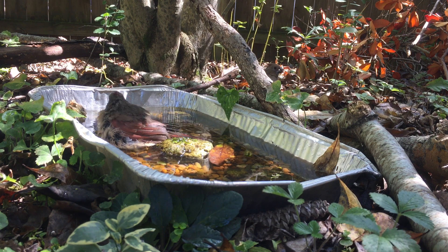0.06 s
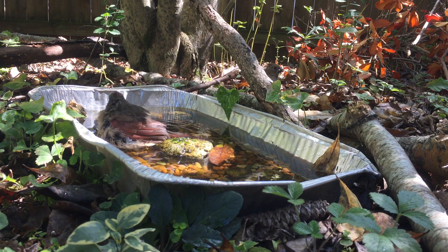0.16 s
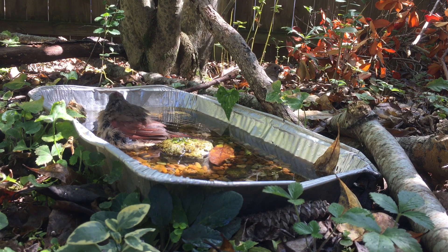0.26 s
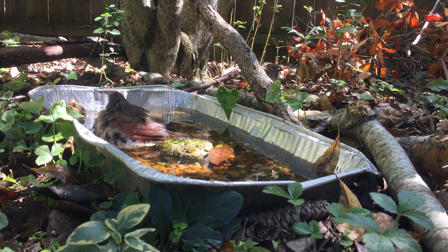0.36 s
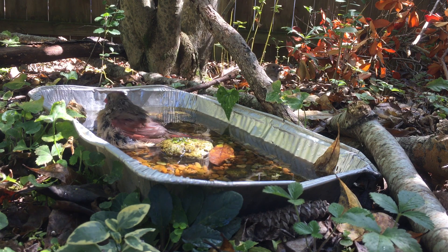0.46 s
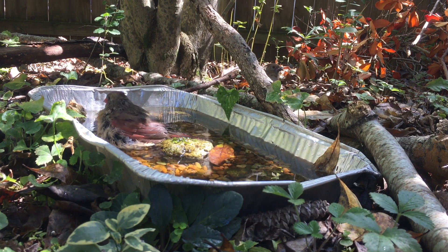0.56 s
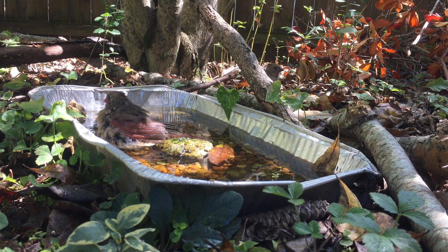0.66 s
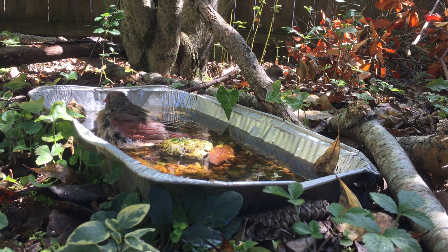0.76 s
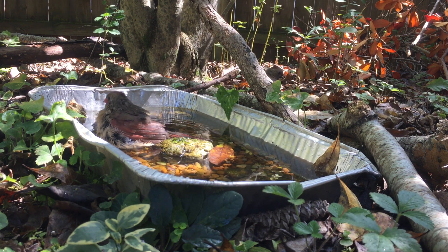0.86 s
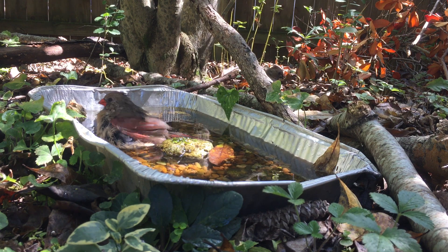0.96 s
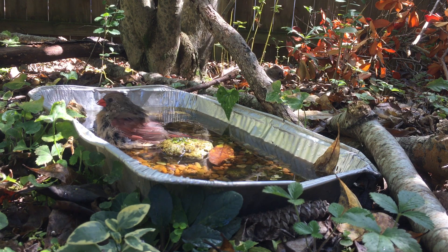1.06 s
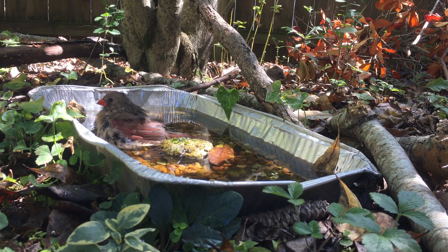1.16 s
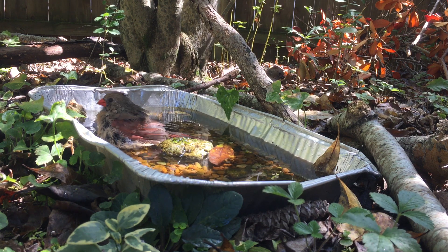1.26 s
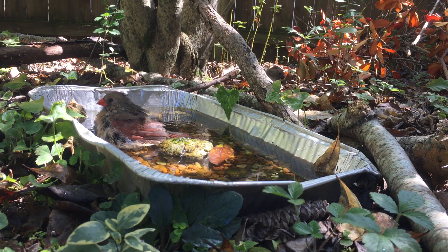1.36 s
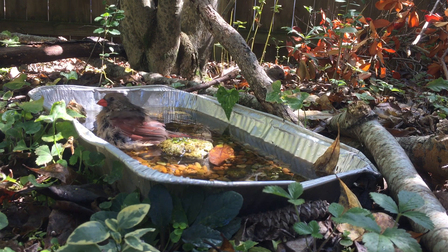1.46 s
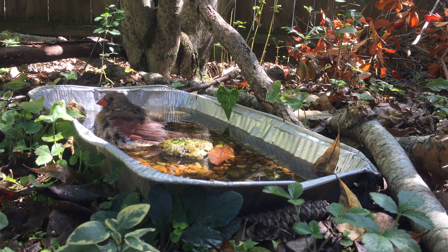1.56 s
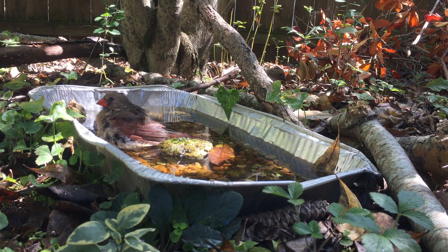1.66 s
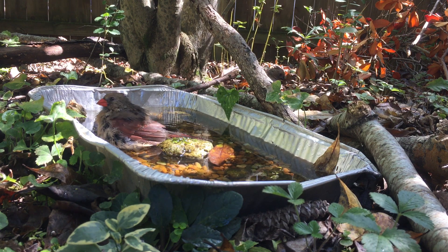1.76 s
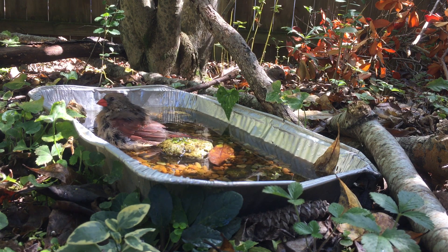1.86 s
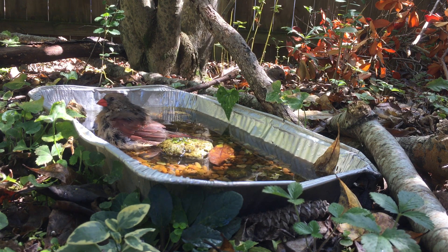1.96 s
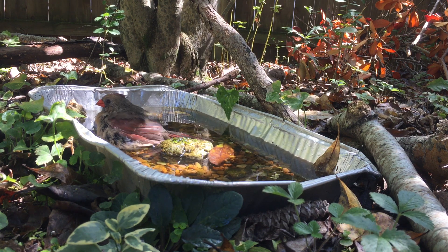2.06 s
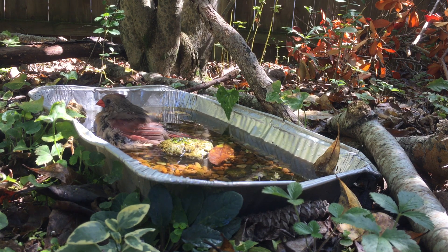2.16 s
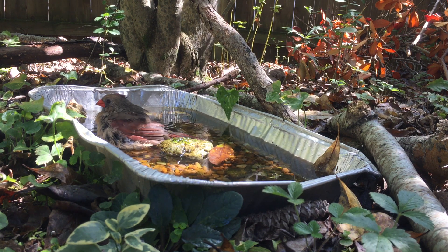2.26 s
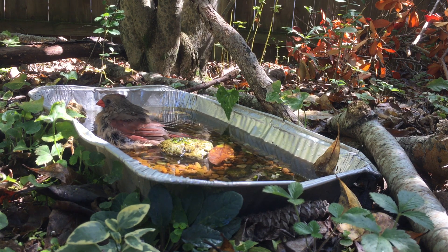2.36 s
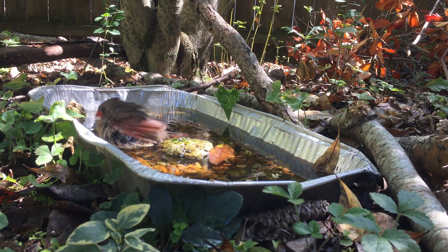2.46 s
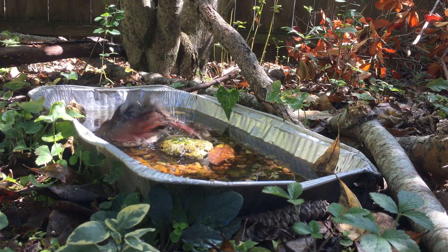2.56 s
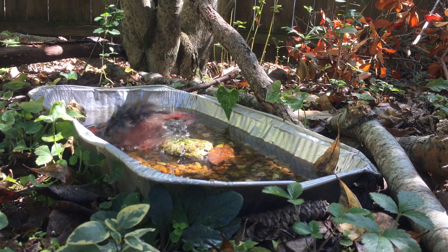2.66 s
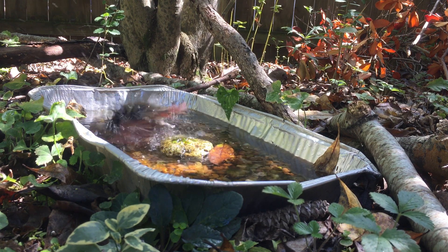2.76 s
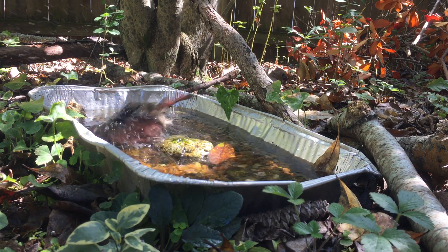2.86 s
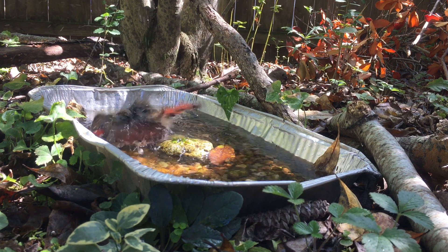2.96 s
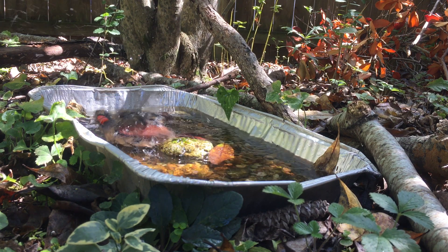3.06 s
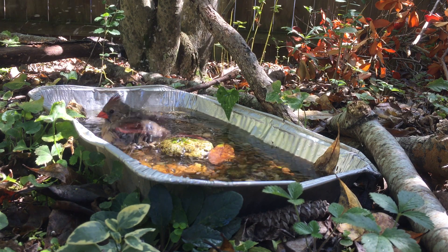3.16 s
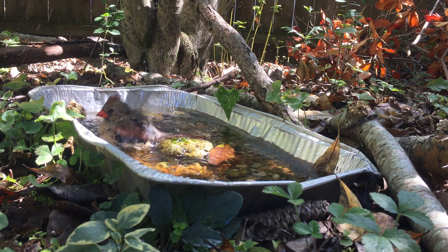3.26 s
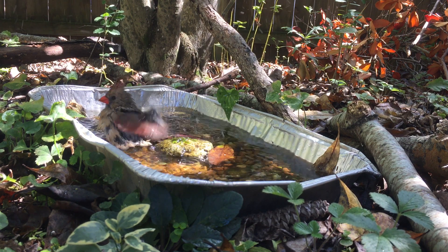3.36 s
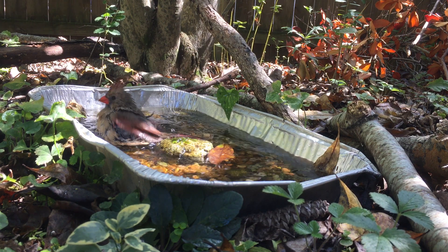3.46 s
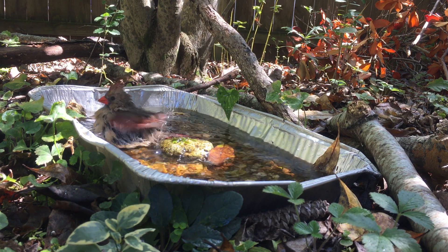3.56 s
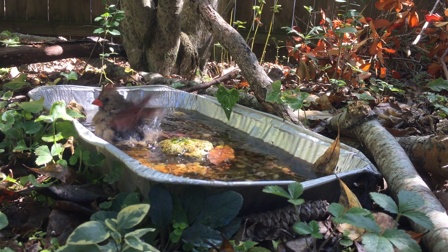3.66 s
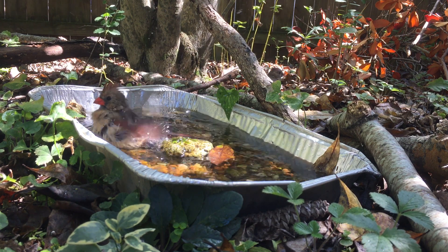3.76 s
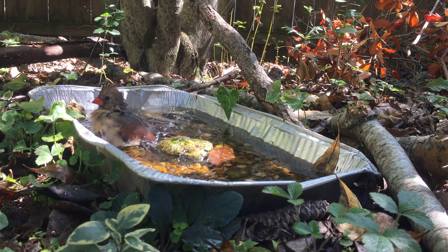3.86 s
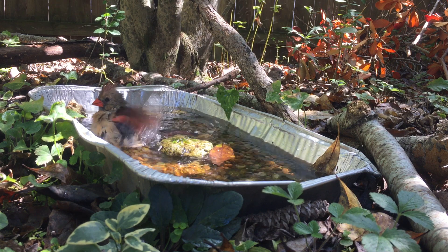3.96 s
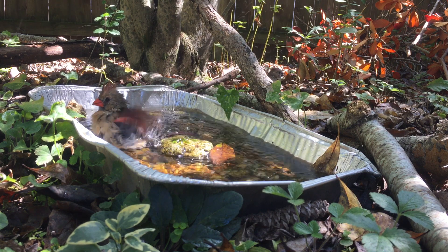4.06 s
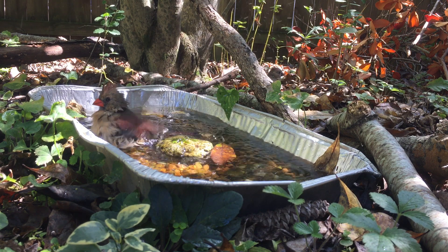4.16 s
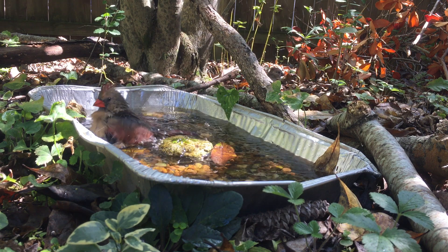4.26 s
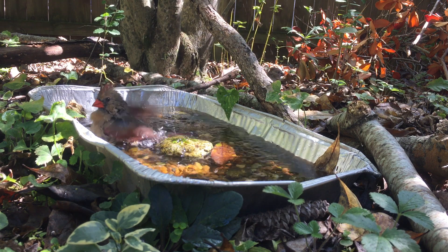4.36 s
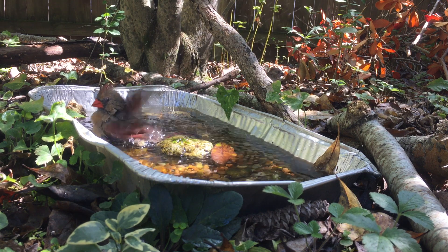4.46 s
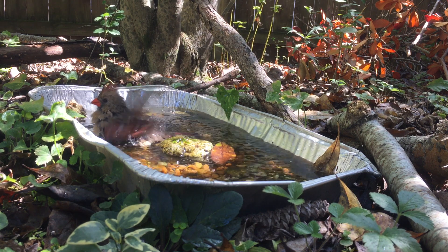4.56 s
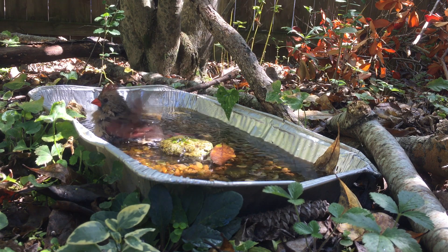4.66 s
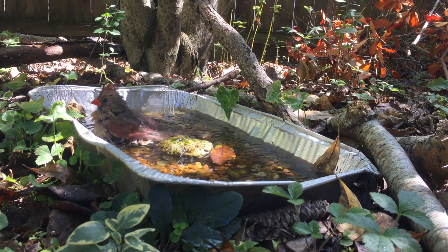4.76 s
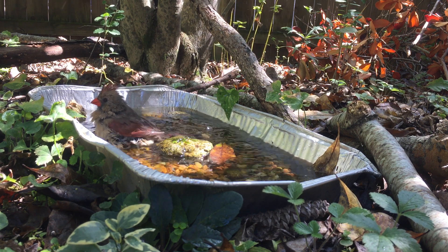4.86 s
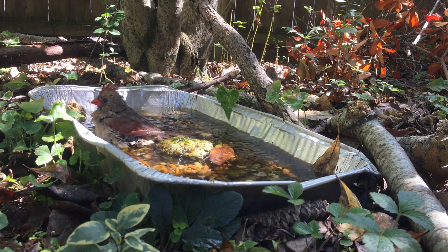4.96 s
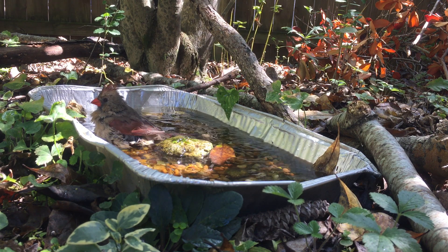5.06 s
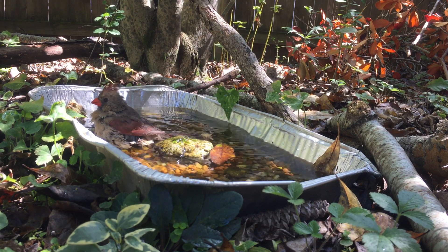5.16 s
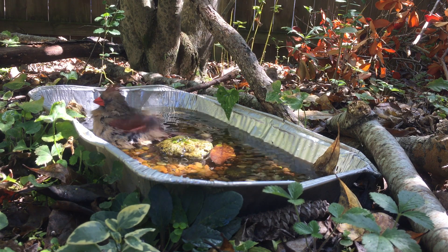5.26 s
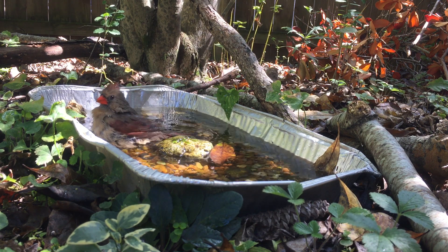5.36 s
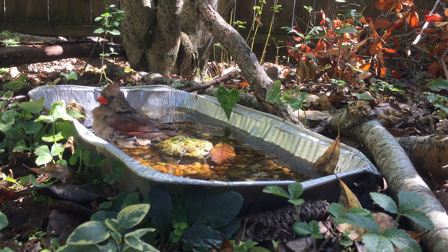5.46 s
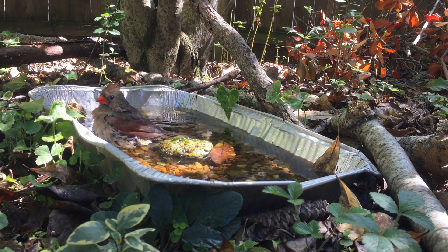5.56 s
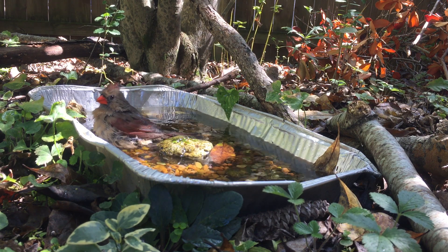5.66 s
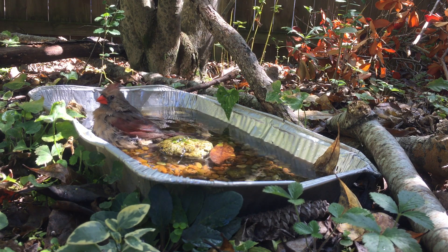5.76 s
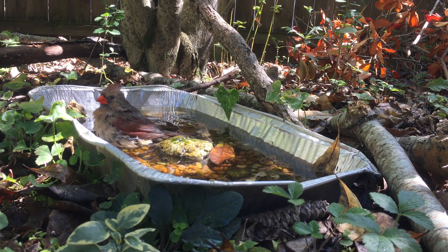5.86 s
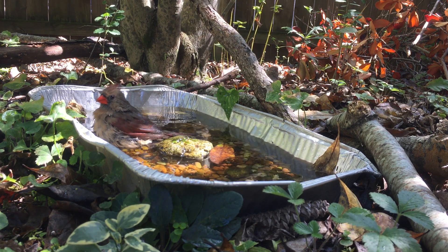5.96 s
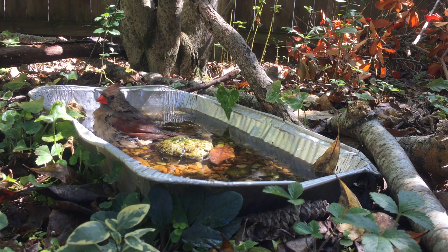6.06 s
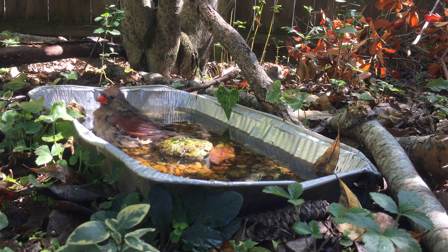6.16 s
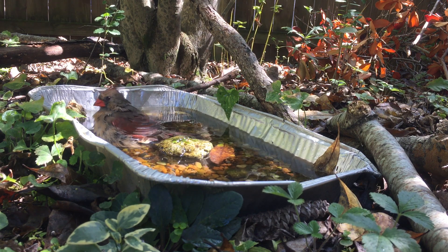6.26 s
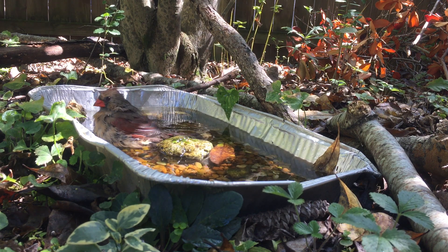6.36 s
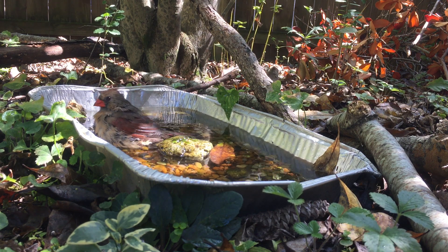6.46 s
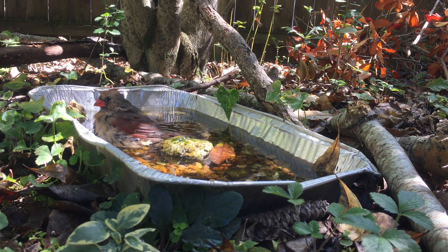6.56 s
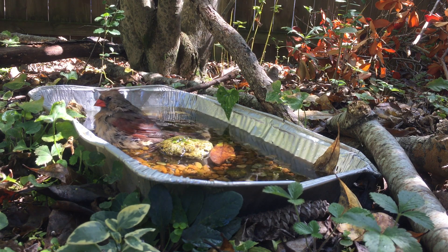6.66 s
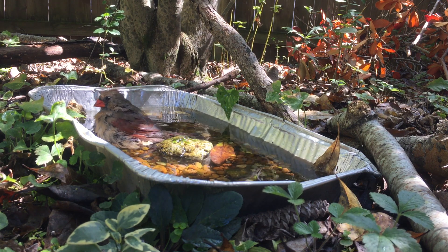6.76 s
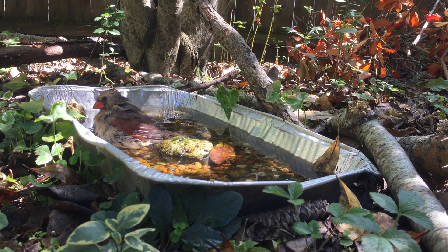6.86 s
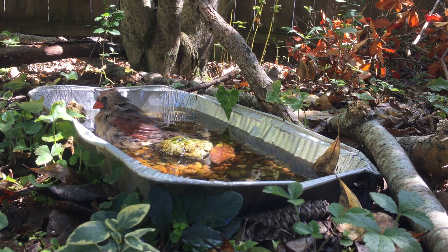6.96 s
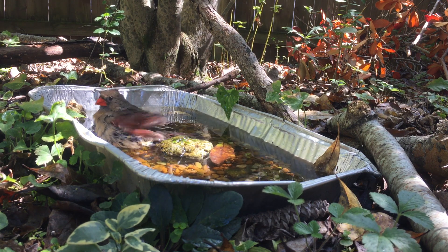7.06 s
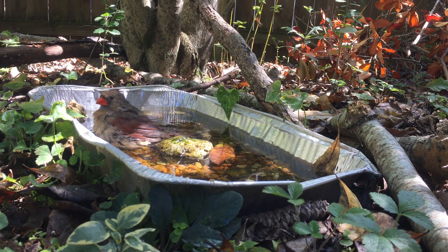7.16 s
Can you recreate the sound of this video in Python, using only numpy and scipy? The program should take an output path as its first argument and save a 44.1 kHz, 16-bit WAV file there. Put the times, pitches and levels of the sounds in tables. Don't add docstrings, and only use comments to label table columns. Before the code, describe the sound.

A songbird bathes in a shallow foil tray, two bursts of rapid wing-slapping splashes over a low throbbing distant hum, with two sharp chips.

```python
import sys
import numpy as np
from scipy import signal
from scipy.fft import rfft, irfft
from scipy.io import wavfile
from scipy.ndimage import uniform_filter1d

SR = 44100
rng = np.random.default_rng(int(sys.argv[2]) if len(sys.argv) > 2 else 0)


def wav_record(signal):
    frames = np.transpose(np.atleast_2d(signal))
    bounded = np.clip(frames, -1, 1)
    quanta = np.round(bounded * 32767).astype(np.int16)
    wavfile.write(sys.argv[1], SR, quanta)


def volts(x):
    e = np.asarray(x, float) / 20
    return 10 ** e


N = 318402
TIME = np.arange(N) / SR
WET_START_S, WET_END_S = 2.62, 5.02


def curve(table):
    s, *columns = np.transpose(table)
    return [np.interp(TIME, s, column) for column in columns]


def colour(x, table):
    hz, db = np.transpose(table)
    f = np.arange(N // 2 + 1) * SR / N + 1
    gain_db = np.interp(np.log(f), np.log(hz), db, left=-99, right=-99)
    y = irfft(rfft(x) * volts(gain_db), N)
    return y / y.std()


def sieve(x, order, hz, kind):
    return signal.sosfilt(signal.butter(order, hz, kind, fs=SR, output="sos"), x)


def soften(x, order, hz):
    return signal.sosfiltfilt(signal.butter(order, hz, fs=SR, output="sos"), x)


def band(x, lo_hz, hi_hz, order=2):
    y = sieve(x, order, [lo_hz, hi_hz], "bandpass")
    return y / y.std()


def noise():
    return rng.standard_normal(N)


def walk(rate):
    k = int(SR / rate)
    held = np.repeat(rng.standard_normal(N // k + 1), k)
    return 1.72 * uniform_filter1d(uniform_filter1d(held, k), k)[:N]


def add(out, s, piece):
    i = int(s * SR)
    out[i:i + len(piece)] += piece


# (frequency [Hz], level [dB per Hz])
RUMBLE_COLOUR = [(15, -56), (25, -34), (54, -24), (84, -6.5), (117, -5.5), (156, -6), (210, -5), (361, -12),
                 (479, -15.5), (620, -24.5), (687, -29.5), (900, -64), (1170, -47), (1980, -120)]
# (frequency [Hz], level [dB per Hz])
HISS_COLOUR = [(410, -36), (700, -2.5), (910, -1.5), (1250, -1.5), (1360, -2.5), (2130, -5), (2730, -10),
               (4050, -8.5), (4800, -14.5), (6320, -13.5), (7590, -19), (8990, -18.5), (10500, -22.5),
               (15000, -22), (16000, -31)]
# (time [s], deep rumble level [dB], length [s])
LORRIES = [
    (.14, -38, 0.074),
    (.97, -45, 0.1),
    (2.796, -49, 0.12),
    (3.55, -47, 0.24),
    (4.1, -59, .15),
    (5.173, -43, 0.091),
    (5.955, -41, 0.15),
    (6.4, -60, 0.1),
    (6.842, -39, 0.66),
]
RUMBLE_DB, HISS_DB, DEEP_DB = -53, -70, -54
SWELL_START_DB, SWELL_END_DB, SWELL_FULL_S = -1.5, 1.3, 6.9


def town():
    swell_db = np.interp(TIME, [0, SWELL_FULL_S], [SWELL_START_DB, SWELL_END_DB])
    passing = volts(DEEP_DB)
    for s, db, length in LORRIES:
        passing = passing + volts(db) * np.exp(-((TIME - s) / length) ** 2)
    patches = np.zeros(N)
    for hz in 42 * 2 ** np.arange(0, 5, .5):
        patches += np.sqrt(hz) * volts(2.2 * walk(6)) * band(noise(), hz / 1.19, hz * 1.19)
    out = volts(RUMBLE_DB + swell_db) * colour(patches, RUMBLE_COLOUR)
    out += volts(-16.5) * passing * band(noise(), 53.6, 62.4)
    return out + volts(HISS_DB + 0.035 * walk(9.1)) * colour(noise(), HISS_COLOUR)


# (multiple of the turning rate, level under the fifth [dB])
ENGINE_ORDERS = [(2, -20), (3, -20), (4, -16), (6, -5), (8, -7), (9, -13), (10, -16), (11, -17), (12, -24),
                 (13, -17)]
# (time [s], fifth order level [dB])
ENGINE_LOAD = [(0, -66), (.3, -55), (.75, -54), (1.05, -51.5), (1.55, -54), (1.9, -54.5), (3.3, -50.5),
               (3.47, -68), (3.65, -52.5), (4.3, -48), (4.9, -53), (5.3, -49.5), (6.35, -53.5), (6.8, -49),
               (7.22, -48)]
# (time [s], level [dB])
BARK = [(0, -8), (1.25, -2.5), (2.05, 0), (2.3, 4.5), (3.0, 1), (3.7, 6), (4.1, -5), (4.5, 3.5),
        (7.22, 1.5)]
# (time [s], blade rate [Hz])
FAN_SPEED = [(0, 106.5), (.25, 106.65), (.6, 106.47), (.95, 105.88), (1.2, 106.1), (1.55, 105.78),
             (1.9, 106.58), (2.35, 107.42), (2.61, 106.93), (2.9, 106.06), (3.25, 106.57), (3.45, 107.35),
             (3.8, 106.94), (4.5, 106.61), (5.9, 106.89), (6.3, 106.42), (6.7, 105.46), (7.22, 106.72)]
# (time [s], level [dB])
FAN_HEARD = [(0, -61), (.25, -51), (.65, -50.5), (.87, -79), (1.15, -50), (1.47, -59.5), (1.85, -46),
             (2.4, -53.5), (2.62, -60), (3.15, -51.5), (3.4, -54.5), (3.85, -48), (4.45, -74), (5.4, -57),
             (5.75, -65), (6.3, -42), (6.65, -54), (7.22, -80)]
# (multiple, width [Hz], level [dB])
FAN_SMEAR = [(2, 15, -65), (3, 9.3, -70), (4, 6.3, -69.5), (5, 2.6, -88.5)]
# (frequency [Hz], level [dB])
STEADY_TONES = [(120, -64), (146, -66), (417.5, -78), (475, -72), (531, -79)]
ENGINE_HZ = 22.13


def hum():
    fan_hz, fan_db, engine_db, bark_db = (curve(table)[0] for table in (FAN_SPEED, FAN_HEARD, ENGINE_LOAD, BARK))
    turns = ENGINE_HZ * TIME
    out = volts(fan_db) * np.sin(2 * np.pi * np.cumsum(fan_hz) / SR)
    out += volts(engine_db) * np.sin(2 * np.pi * 5 * turns)
    for k, db in ENGINE_ORDERS:
        level_db = engine_db.mean() + db + (k > 7) * bark_db + 1.2 * walk(2.42)
        out += volts(level_db) * np.sin(2 * np.pi * k * (turns + 0.018 * walk(1.494)))
    for hz, db in STEADY_TONES:
        out += volts(db + 2.0 * walk(1.68)) * np.sin(2 * np.pi * (hz * TIME + rng.random()))
    out *= np.sqrt(2)
    for k, width, db in FAN_SMEAR:
        centre = k * fan_hz.mean()
        smear = band(noise(), centre - width / 2, centre + width / 2, order=1)
        out += volts(db + (k < 3) * bark_db + 1.2 * walk(2.993)) * smear
    return out


# (time [s], second level [dB], third level [dB])
OVERTONES = [(0.0, -77, -82), (0.2, -60.5, -68.5), (2.31, -62.5, -68), (2.37, -63, -55), (2.43, -55.5, -88),
             (2.61, -59.5, -63), (4.0, -54.5, -72.5), (4.12, -63, -50.5), (4.36, -55, -82),
             (4.44, -54, -63), (5.35, -64, -72), (5.47, -58, -54.5), (5.51, -51, -69), (5.97, -68, -56),
             (6.05, -53.5, -70), (7.02, -61, -62), (7.18, -51, -71), (7.22, -65, -43)]
# (time [s], level [dB], start [Hz], end [Hz], length [s])
FAR_CALLS = [
    (1.46, -83, 2830, 2880, .04),
    (1.54, -78, 2870, 2960, .07),
    (5.6, -80, 2950, 3050, .04),
]
# (time [s], level [dB], start [Hz], end [Hz], length [s])
SURGES = [
    (0.162, -57, 276, 277, 0.061),
    (.395, -62, 327, 334, 0.069),
    (.9, -54.5, 191.4, 199, .15),
    (1.2, -52.5, 208, 207, 0.095),
    (1.502, -61, 202, 210, 0.19),
    (4.799, -60, 366, 363, 0.066),
    (5.759, -62.5, 390, 396, 0.15),
    (6.676, -63.5, 534, 526, 0.086),
]
CRICKET_HZ, CRICKET_WIDTH_HZ, CRICKET_DB = 4080, 90, -102


def distance():
    turns = np.cumsum(curve(FAN_SPEED)[0]) / SR
    out = np.zeros(N)
    for k, db in zip((2, 3), curve(OVERTONES)):
        out += volts(db + 1.44 * walk(6.7)) * np.sin(2 * np.pi * (k * turns + 0.21 * walk(4)))
    for s, db, start_hz, end_hz, length in FAR_CALLS + SURGES:
        t = TIME - s
        swell = np.exp(-(2 * t / length) ** 2)
        glide = (start_hz + end_hz) * t + (end_hz - start_hz) / length * t ** 2
        out += np.sqrt(2) * volts(db) * swell * np.sin(np.pi * glide)
    cricket = band(noise(), CRICKET_HZ - CRICKET_WIDTH_HZ / 2, CRICKET_HZ + CRICKET_WIDTH_HZ / 2)
    return out + volts(CRICKET_DB + 4.8 * walk(15)) * cricket


# (delay [s], level [dB])
FENCES = [
    (.0155, -12),
    (.053, -13),
    (.0715, -6.5),
    (.098, -12),
]
GARDEN_T60_S, GARDEN_DB = .54, 4.5


def garden():
    t = np.arange(int(.7 * SR)) / SR
    direct = 1.3 * (t == 0)
    for s, db in FENCES:
        direct[int(s * SR)] = volts(db)
    direct = sieve(direct, 4, 6500, "lowpass")
    rattle = np.exp(-t / 0.0065) * rng.standard_normal(len(t))
    direct += 0.16 * sieve(rattle, 4, 10500, "highpass")
    twigs = np.exp(-t / .008) * (t > .006)
    trees = np.exp(-np.log(1000) * t / GARDEN_T60_S) * np.clip((t - .002) / .006, 0, 1)
    tail = volts(-46.0) * twigs / np.linalg.norm(twigs) + volts(GARDEN_DB) * trees / np.linalg.norm(trees)
    air = 1.8 * signal.lfilter(*signal.butter(2, 7500, "highpass", fs=SR), rng.standard_normal(len(t)))
    dull = soften(air, 8, 9800)
    air = dull + (air - dull) * np.exp(-t / .13)
    air += soften(air, 4, 6300) * (.8 * np.exp(-t / .45) - 1)
    return direct + tail * air


# (time [s], level [dB], start [Hz], end [Hz], glide [ms], length [ms])
CHIPS = [
    (3.574, -35.5, 5140, 8280, 11.7, 33.3),
    (5.536, -35.5, 5300, 8490, 11.8, 38.4),
]
# (frequency [Hz], level [dB])
BEAK = [(4000, 0), (9000, 3.5), (11500, 4.5), (12300, -10), (13000, -5), (13700, 5), (15200, 6),
        (15900, -25)]
OCTAVE_DB = -22


def chips():
    out = np.zeros(N)
    for s, db, start_hz, end_hz, glide_ms, ms in CHIPS:
        t = np.arange(int(ms * SR / 1000)) / SR
        hz = end_hz - (end_hz - start_hz) * np.exp(-t * 1000 / glide_ms)
        phase = 2 * np.pi * np.cumsum(hz) / SR
        attack = np.clip(t / 0.0025, 0, 1) ** 2.1
        swell = attack * (0.11 + 0.5 * np.exp(-t / 0.0041)) * np.clip((t[-1] - t) / 0.02, 0, 1)
        whistle = np.sin(phase) + volts(OCTAVE_DB) * np.sin(2 * phase)
        add(out, s, np.sqrt(2) * volts(db) * swell * whistle)
    heard = signal.fftconvolve(out, garden())[:N]
    return heard.std() * colour(heard, BEAK)


# (time [s], peak level [dB], frequency [Hz])
SPATTER = [(2.7516, -54, 4310), (2.7712, -57, 12580), (2.773, -56, 5170), (2.831, -47, 2240),
           (2.8677, -50, 11890), (2.8782, -55, 6370), (2.8824, -43, 2430), (2.9413, -55, 9130),
           (2.9954, -56, 8960), (2.996, -48, 6070), (3.0102, -57, 11200), (3.02, -53, 2570),
           (3.028, -59, 6200), (3.0425, -56, 13780), (3.056, -55, 6370), (3.0926, -51, 14810),
           (3.1049, -50, 3450), (3.1307, -49, 8790), (3.1394, -46, 3790), (3.1706, -52, 14300),
           (3.6727, -46.5, 6720), (3.8113, -56, 9650), (3.812, -49, 2930), (3.8581, -55, 13440),
           (3.8585, -56, 6200), (3.8592, -50, 2580), (3.9361, -58, 5860), (3.9361, -56, 9130),
           (3.9365, -55, 14640), (3.9365, -55, 11890), (3.9456, -55, 6370), (3.988, -52, 15160),
           (4.0323, -45, 14810), (4.0711, -47, 14300), (4.0713, -48, 3200), (4.0763, -49, 9130),
           (4.0769, -52, 14130), (4.083, -42, 6030), (4.0867, -59, 9130), (4.123, -49, 6430),
           (4.27, -56, 3790), (4.2765, -53, 11710), (4.4296, -55, 14990), (4.4659, -50, 3960),
           (4.4756, -49, 15160), (4.4767, -55, 9130), (4.4767, -57, 12060), (4.5217, -43, 12060),
           (4.5424, -54, 3960), (4.607, -47, 3790), (4.657, -40, 9300), (4.6886, -48, 11800),
           (4.707, -47, 4100), (4.707, -50, 6890), (4.734, -52, 9300), (4.7356, -52, 3960),
           (4.7372, -50, 12060), (4.7572, -48, 6340), (4.8054, -49, 3790), (4.8065, -57, 5860)]
TICK_MS, TICK_DB = 0.43, 0.5


def spatter():
    out, t = np.zeros(N), np.arange(-200, 300) / SR
    for (s, db, hz), turn in zip(SPATTER, rng.random(len(SPATTER))):
        ms = TICK_MS * (6000 / hz) ** 0.41
        shape = np.exp(-np.abs(t) * 1000 / np.where(t < 0, 0.56 * ms, 1.4 * ms))
        add(out, s + t[0], volts(db + TICK_DB) * 2.0 * shape * np.sin(2 * np.pi * (hz * t + turn)))
    return out


# (time [s], peak level [dB], frequency [Hz])
PLOPS = [(.535, -71, 720), (2.739, -43.5, 550), (2.739, -63, 1390), (2.876, -56, 1210), (3.027, -64, 1290),
         (3.09, -60, 1140), (3.145, -63, 1710), (3.18, -54, 700), (3.273, -64, 1080), (3.29, -62, 1120),
         (3.428, -65, 990), (3.477, -65, 1350), (3.557, -70, 1290), (3.762, -50, 610), (3.987, -53, 990),
         (4.077, -60, 1190), (4.274, -66, 1380), (4.326, -57, 680), (4.43, -47.5, 750), (4.513, -65, 1450),
         (4.566, -56, 1400), (4.657, -55, 1070), (4.657, -50, 1580), (4.757, -68, 1460), (4.807, -57, 780),
         (4.976, -68, 1240), (5.146, -63, 1030), (5.396, -54.5, 686)]
# (time [s], peak level [dB])
SNAPS = [(2.781, -42), (2.827, -24), (2.8762, -39), (3.1306, -28), (3.1705, -40), (3.8087, -42),
         (3.9011, -23), (3.9884, -38), (4.0333, -32), (4.4294, -41), (4.4757, -37), (4.5204, -33),
         (4.5674, -43), (4.6567, -33), (4.698, -41), (4.7068, -46), (4.7465, -43), (4.7655, -46),
         (4.8098, -38), (5.3945, -45), (3.0695, -45), (3.1052, -42), (3.504, -53), (3.716, -52),
         (3.756, -47), (3.8022, -46), (3.8525, -43), (4.1718, -40), (4.3722, -43), (4.8685, -52),
         (5.0652, -55), (5.399, -50), (2.736, -43), (4.0829, -33), (3.219, -46), (2.8872, -41)]
PLOP_MS = 1.7


def knocks():
    out, clicks, t = np.zeros(N), np.zeros(N), np.arange(-400, 600) / SR
    for (s, db, hz), turn in zip(PLOPS, rng.random(len(PLOPS))):
        shape = np.exp(-np.abs(t) * 1000 / np.where(t < 0, .5 * PLOP_MS, PLOP_MS))
        add(out, s + t[0], volts(db + 7) * shape * np.sin(2 * np.pi * (hz * t * (1 + 3.6 * t) + turn)))
    for s, db in SNAPS:
        clicks[int(s * SR)] = -volts(db)
    snaps = band(clicks, 3500, 16500)
    return out + snaps * np.abs(clicks).max() / np.abs(snaps).max()


def droplets(rate, scatter_db, smear_ms):
    size_db = scatter_db * np.minimum(rng.exponential(size=N), 3)
    ticks = (rng.random(N) < rate / SR) * volts(size_db)
    puffs = signal.lfilter([1], [1, -np.exp(-1000 / (smear_ms * SR))], ticks ** 2)
    return np.sqrt(puffs + 0.06 * puffs.mean()) * noise()


def puff(source, shape):
    piece = source * shape
    return piece * np.linalg.norm(shape) / np.linalg.norm(piece)


def fizz(rate, lo_hz, hi_hz, cycles, scatter_db):
    out, t = np.zeros(N), np.arange(500) / SR
    start, end = WET_START_S - .1, WET_END_S + .1
    for when, pitch, size in rng.random((int(rate * (end - start)), 3)):
        hz = lo_hz * (hi_hz / lo_hz) ** pitch
        ring = np.exp(-t * hz / cycles) * np.sin(2 * np.pi * hz * t * (1 + 0.016 * hz * t))
        add(out, start + when * (end - start), volts(-scatter_db * np.log(size + 0.022)) * ring)
    return out / out[int(start * SR):int(end * SR)].std()


# (time [s], blow level [dB], spray
# over blow [dB], bubble [Hz], spread [ms])
DIP = [(2.6827, -52, -7, 2900, 2.4), (2.7384, -38, -2, 2690, 3.1), (2.7884, -45.5, 3.5, 3900, 7),
       (2.827, -35.5, 4, 6450, 1.25), (2.876, -37, 1.5, 2010, 1.1), (2.8872, -54, -4, 2650, 3.1),
       (2.9298, -45.5, -3, 3150, 2.5), (2.981, -48, 7, 4430, 4.1), (3.04, -50, 4, 2640, 9.7),
       (3.091, -44, -4, 2840, 4.1), (3.1307, -46, 12.5, 6500, 1.2), (3.18, -54, -24, 2820, 4.1),
       (3.2717, -63, -12, 2082, 2.3), (3.3698, -59, -5.5, 2210, 12), (3.427, -60.5, -2, 2150, 6.6),
       (5.396, -55, -4, 2300, 3)]
# (time [s], blow level [dB], spray over blow [dB], bubble [Hz], spread [ms])
FLUTTER = [(3.763, -38, -2, 3550, 1.15), (3.8057, -38.5, -4, 3900, 0.64), (3.8534, -41.5, -4, 2500, 2),
           (3.9012, -34.5, 1.5, 4300, 2.3), (3.9438, -46, 2, 3660, 2.3), (3.988, -36.5, -0.5, 2300, 1.8),
           (4.0329, -31.5, 0.5, 4070, 1.6), (4.083, -32, -13, 3660, 1.3), (4.1232, -47.5, 3, 2760, 5.9),
           (4.1722, -35.5, -3.5, 2350, 2), (4.2243, -49, -2, 2580, 3.3), (4.2757, -52.5, 0, 2700, 4),
           (4.3275, -50.5, -6, 3300, 5.1), (4.373, -48.5, 0, 4010, 2), (4.4292, -41.5, -6, 2540, 1.9),
           (4.476, -34.5, -5, 2400, 2), (4.5205, -40.5, 4.5, 2533, 3.6), (4.5671, -36, -11, 3800, 1.1),
           (4.6107, -38.5, -4, 2710, 2), (4.6561, -35.5, -2, 4070, 1.5), (4.7063, -67, 19, 3950, 2.2),
           (4.7565, -41.5, -4.5, 2360, 3.4), (4.8093, -44, 4, 4000, 3.6), (4.8631, -50, -1, 3090, 2.4)]
# (time [s], blow level [dB],
# spray over blow [dB], bubble [Hz])
DROPS = [(2.6432, -56.5, -4, 3740), (2.658, -51.5, -30, 2680), (2.707, -52, 3, 5580),
         (2.8383, -45, 2, 6160), (2.9974, -45, 0, 5960), (3.0524, -47.5, -17, 2650),
         (3.0705, -55, 13, 4070), (3.1043, -54, -9, 3040), (3.145, -45, -3, 2750), (3.157, -44, -20, 3750),
         (3.171, -53.5, 12, 3640), (3.193, -55, -21, 2870), (3.2191, -49, -13, 2290),
         (3.251, -55.5, -2, 3750), (3.2841, -63, -15, 3814), (3.297, -64, -19, 2760),
         (3.3194, -61, -8, 2060), (3.4448, -54, 0, 2870), (3.504, -70, 17.5, 2820),
         (3.58, -57.5, -16, 3950), (3.589, -57.5, -7, 3970), (3.6534, -50, -3, 2980),
         (3.676, -62, -22, 2460), (3.7019, -58, -5, 3400), (3.716, -55.5, 9, 3840), (3.727, -58, -9, 3280),
         (0.5227, -64, -5, 4030), (5.258, -66, 4, 5600), (2.1598, -57, -5, 3400), (0.535, -65, -25, 710)]
# (time [s], blow level [dB], spray over blow [dB], bubble [Hz])
SHAKEN = [(3.75, -56, -2, 8500), (3.755, -49, -7, 3530), (3.774, -47, -14, 7040), (3.794, -66, 1, 13000),
          (3.9278, -52, -16, 4050), (3.9515, -58, 11, 6800), (3.978, -45, 1, 2780), (4.0934, -58, 18, 6000),
          (4.1616, -49, -3, 4030), (4.2924, -59, -23, 2710), (4.3474, -71, -13, 4220),
          (4.3818, -52, 2, 3200), (4.4656, -55, -9, 4180), (4.5422, -63, 5, 4170), (4.5596, -58, 17, 3830),
          (4.7465, -75, 12, 2430), (4.6983, -70, 20, 7020), (4.7356, -68, 4, 4030), (4.7655, -74, 16, 3940),
          (4.969, -59, -1, 4080), (5.066, -76, 21, 2205), (5.14, -64, -14, 3370),
          (5.1464, -55.5, -6.5, 2260), (5.1643, -57.5, -5, 2000), (5.246, -63, 7, 1840),
          (5.294, -63, -7, 4200), (5.508, -66, 4, 4500), (5.61, -68, -14, 2960), (5.012, -65, 0, 4300)]
# (time [s], thud level on the tray [dB])
DIP_DEPTH = [(2.68, -57.5), (2.737, -48.5), (2.83, -56), (2.9, -50), (3.0, -64.5), (3.09, -49.5),
             (3.13, -72), (3.18, -53), (3.43, -67.5)]
# (time [s], thud level on the tray [dB])
FLUTTER_DEPTH = [(3.76, -50), (3.98, -48), (4.08, -52), (4.38, -55.5), (4.43, -47), (4.48, -48),
                 (4.66, -45.5), (4.83, -56.5), (5.39, -54)]
DROP_MS, DROP_THUD_DB = 3.6, -22


def blows():
    s, db, over_db, hz, ms = np.transpose(DIP + FLUTTER)
    depth_db = np.interp(s, *np.transpose(DIP_DEPTH + FLUTTER_DEPTH))
    beats = np.transpose([s, db, db + over_db, depth_db, hz, ms])
    s, db, over_db, hz = np.transpose(DROPS + SHAKEN)
    ms = DROP_MS * (3000 / hz) ** 0.6
    return np.r_[beats, np.transpose([s, db, db + over_db, db + DROP_THUD_DB, hz, ms])]


RAIN_RISE_S, DIP_FALL_S, FLUTTER_FALL_S = 0.012, 0.036, 0.022


def aloft(beats, power_db):
    out, t = np.zeros(N + SR), np.arange(SR // 2) / SR
    for k, (s, db) in enumerate(zip(beats[:, 0], power_db)):
        fall_s = DIP_FALL_S if k < len(DIP) else FLUTTER_FALL_S
        add(out, s, volts(db) * np.exp(-t / fall_s) * (1 - np.exp(-t / RAIN_RISE_S)))
    return out[:N]


RAIN_BODY_DB, RAIN_SPRAY_DB, DRIZZLE_DB = -6.5, -7.5, -78
DIP_RAIN_DB, FLUTTER_MIST_DB = 12, -0.5


def shower(rain, thud):
    beats = blows()[:len(DIP + FLUTTER)]
    in_dip = np.arange(len(beats)) < len(DIP)
    depth_db = beats[:, 3] + DIP_RAIN_DB * in_dip
    fine_db = 0.4 * depth_db + 0.64 * (beats[:, 2] - 9) + RAIN_SPRAY_DB + FLUTTER_MIST_DB * ~in_dip
    big_db = 0.56 * depth_db + 0.48 * (beats[:, 1] - 11) + RAIN_BODY_DB
    fine = volts(DRIZZLE_DB + RAIN_SPRAY_DB + 3.0) + aloft(beats, fine_db)
    big = volts(DRIZZLE_DB) + aloft(beats, big_db)
    out = big * volts(-3.0) * band(rain, 2050, 4310, order=4)
    out += fine * band(rain, 6400, 15300, order=4)
    out += big * volts(-7.5) * fizz(260, 1500, 6400, cycles=3, scatter_db=3.0)
    out += big * volts(-16.5) * thud
    wet = uniform_filter1d(1. * ((TIME > WET_START_S) & (TIME < WET_END_S)), 4000)
    return wet * out


# (frequency [Hz], level [dB per Hz])
TRAY = [(880, -28), (1500, -45), (1780, 2.5), (2340, -1), (3030, -3), (3810, -1), (4240, 2), (5020, 4.5),
        (6060, 1), (7690, -15), (9100, -5.5), (10500, -15), (12400, -7.5), (14900, -14), (16000, -15)]
# (frequency [Hz], level [dB per Hz])
FOIL = [(250, 4), (420, 6.5), (650, 1.5), (950, -6), (1300, -8.5), (1900, -15)]
CRACK, RING_LEAD = 1.15, .17


def bath():
    water = colour(droplets(4000, scatter_db=4.5, smear_ms=0.13), TRAY)
    rain = colour(droplets(1500, scatter_db=-1.5, smear_ms=0.97), TRAY)
    body, spray = band(water, 2096, 4225, order=4), band(water, 6510, 19500, order=4)
    thud = colour(noise(), FOIL)
    out, t = np.zeros(N), np.arange(-1500, 1500) / SR
    drop_times = [row[0] for row in DROPS + SHAKEN]
    rows = blows()
    for (s, body_db, spray_db, thud_db, hz, ms), chance in zip(rows, rng.random((len(rows), 2))):
        here = slice(int(s * SR) - 1500, int(s * SR) + 1500)
        sharpness = 2.5 if s in drop_times else 1.25
        lead, trail = (.12, 1.4) if s < 3.5 and ms < 1.8 else (1.4, .45)
        core = np.exp(-np.abs(t) / np.where(t < 0, lead * ms, trail * ms) * 1000)
        crack = CRACK * np.exp(-(ms / 2.3) ** 2) * np.exp(-np.abs(t) / 0.000092)
        sweep = np.exp(-(t / 0.013) ** 2) * volts(thud_db - 1.5)
        ring = np.exp(-np.abs(t) / np.where(t < 0, RING_LEAD * ms, .85 * ms) * 1000)
        bubble = np.sin(2 * np.pi * (hz * (t + 13.0 * (chance[0] - .3) * t ** 2) + chance[1]))
        ring_db = spray_db if hz > 5000 else body_db
        share = np.clip((body_db - spray_db) / 16.0, .3, .82)
        out[here] += volts(ring_db + 6.0) * share * ring * bubble
        splash = np.sqrt(1 - share ** 2) * core + 0.15 * crack
        out[here] += puff(body[here], volts(body_db - 6.5) * splash + 0.26 * sweep)
        out[here] += puff(spray[here], volts(spray_db - 9) * (core ** sharpness + crack) + 0.36 * sweep)
        boom = np.exp(-np.abs(t) / (0.0072 + 0.0006 * ms))
        out[here] += puff(thud[here], volts(thud_db - 3.0) * boom)
        jump = np.exp(-(t / 0.00056) ** 2) * np.cos(2 * np.pi * (400 + 400 * chance[0]) * t - 0.6)
        out[here] -= volts(thud_db + 4.5) * jump
    return out + shower(rain, thud)


def scene():
    return (town() + hum() + distance() + chips() + spatter() + knocks() + bath())[None]


def low_pass(x):
    return signal.sosfilt(signal.butter(12, 15880, fs=SR, output="sos"), x)


def record(dry):
    mix = sieve(dry, 2, 48, "highpass")
    mix = signal.sosfilt(signal.ellip(8, .2, 70, 15800, fs=SR, output="sos"), mix)
    return low_pass(mix)


dry = scene()
out = record(dry)
wav_record(out)
```